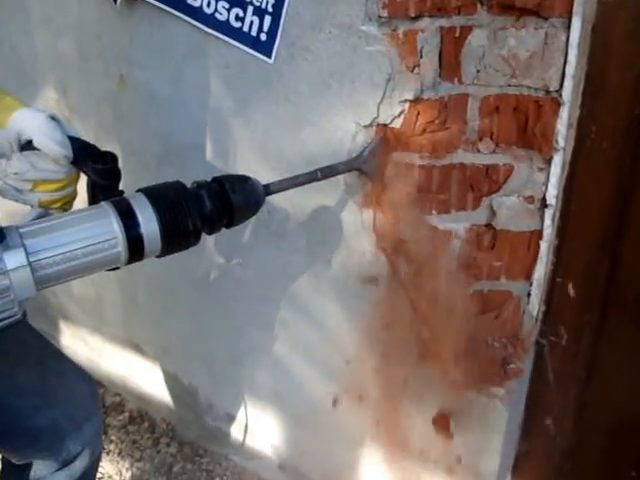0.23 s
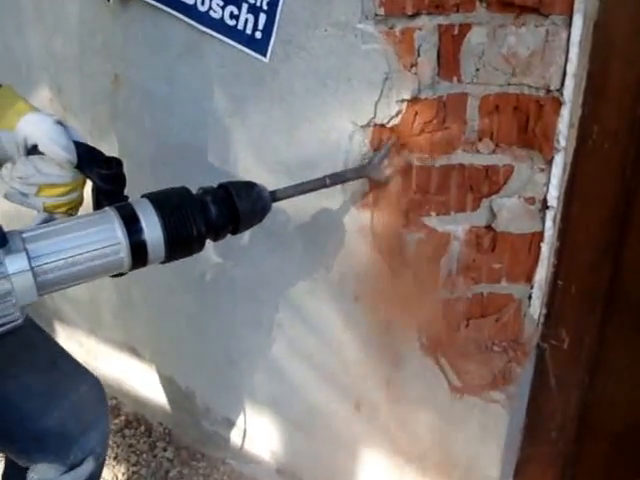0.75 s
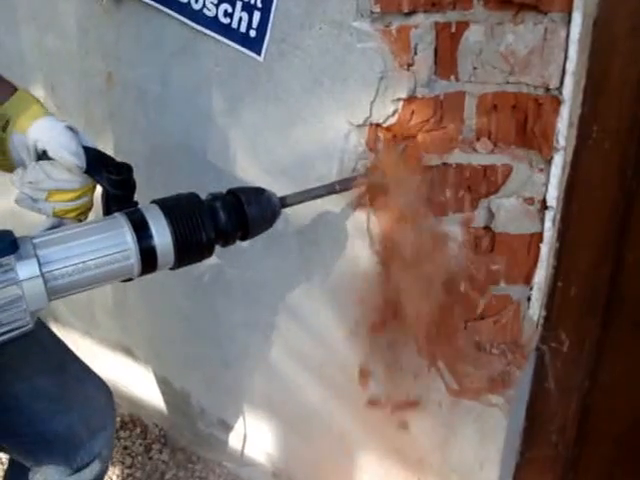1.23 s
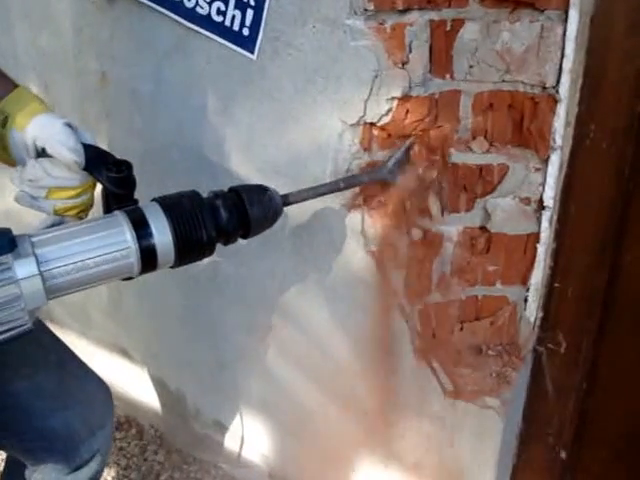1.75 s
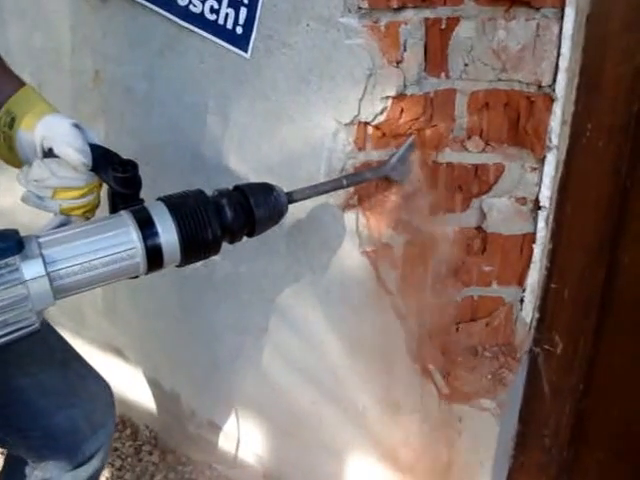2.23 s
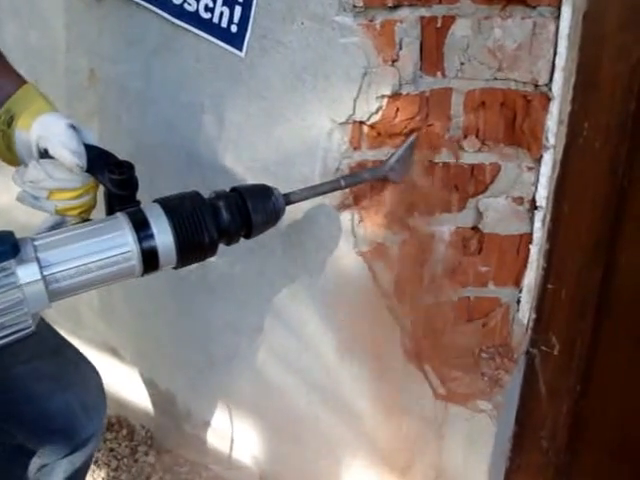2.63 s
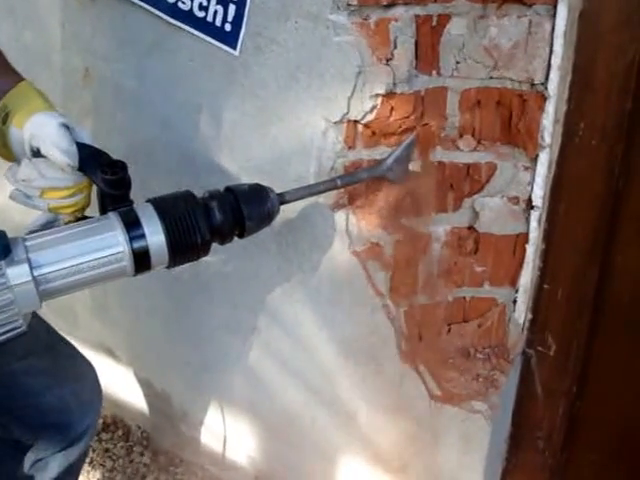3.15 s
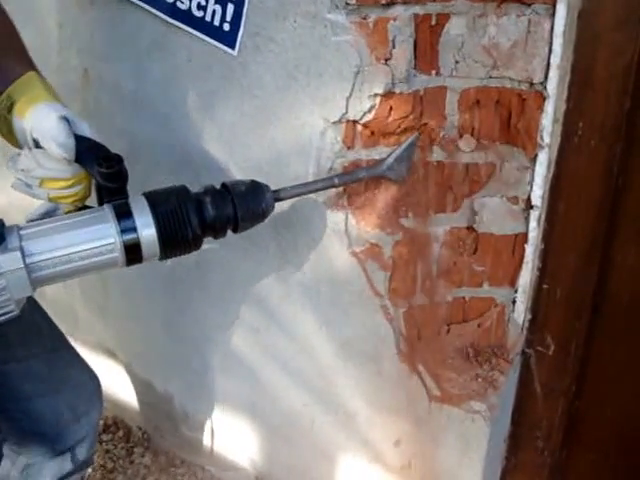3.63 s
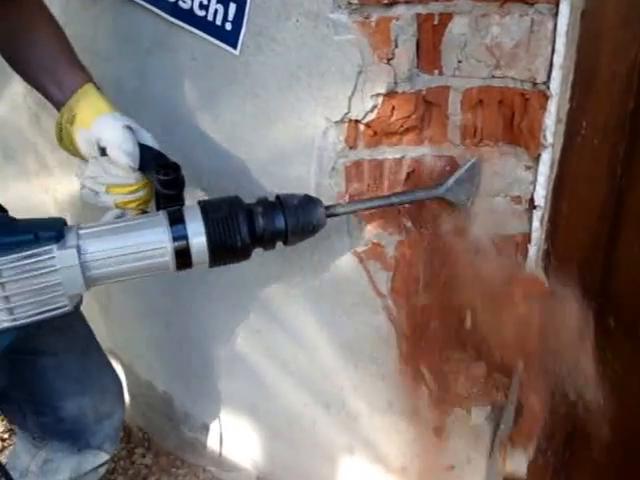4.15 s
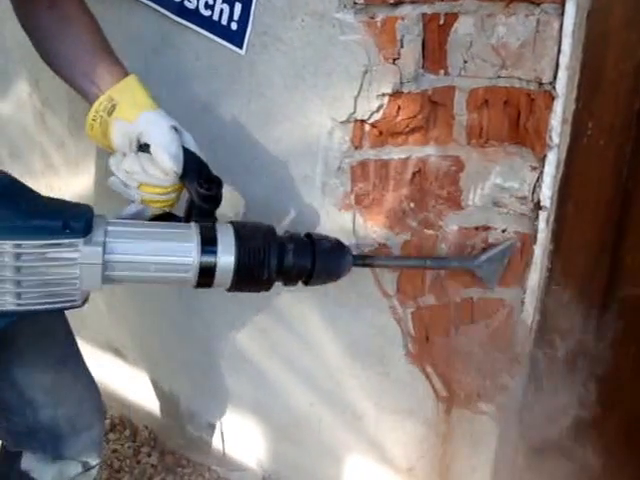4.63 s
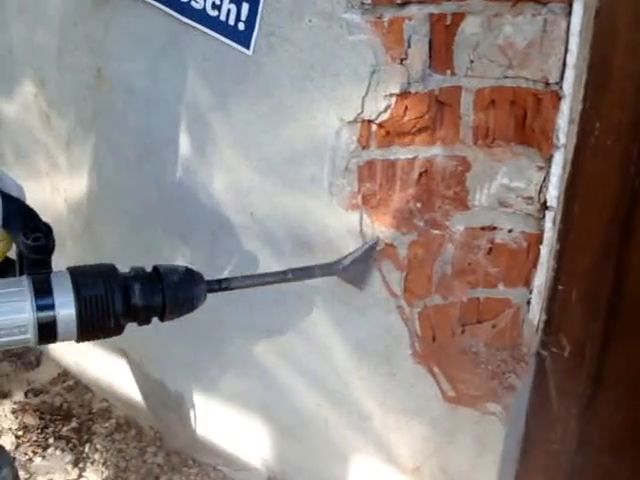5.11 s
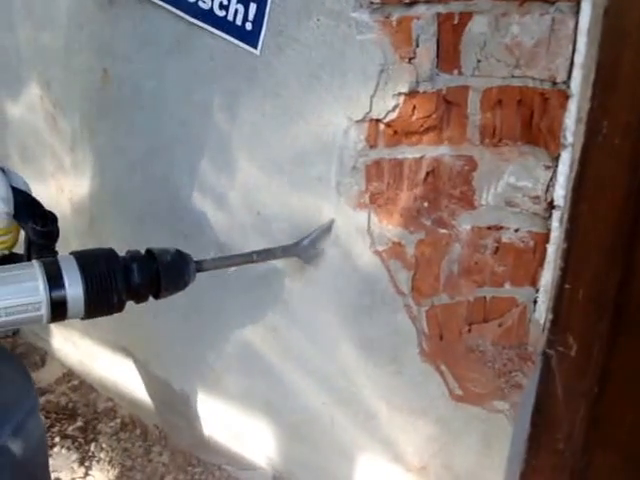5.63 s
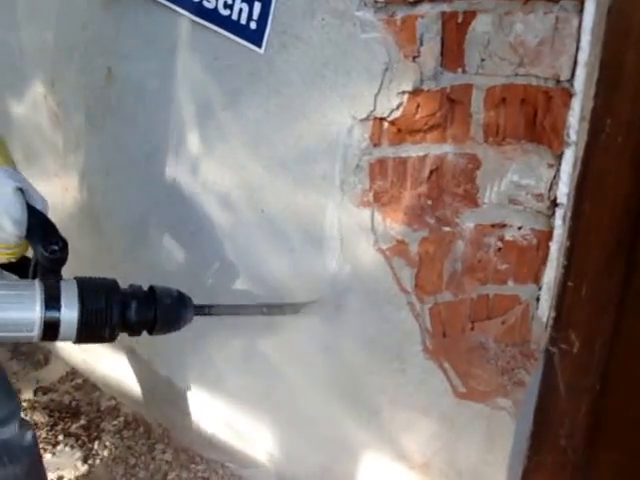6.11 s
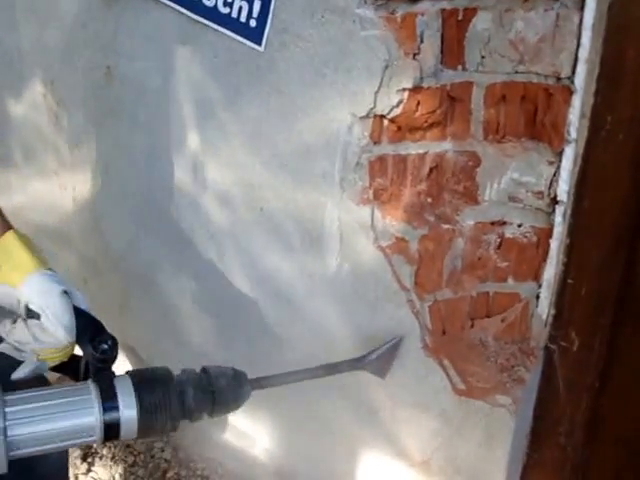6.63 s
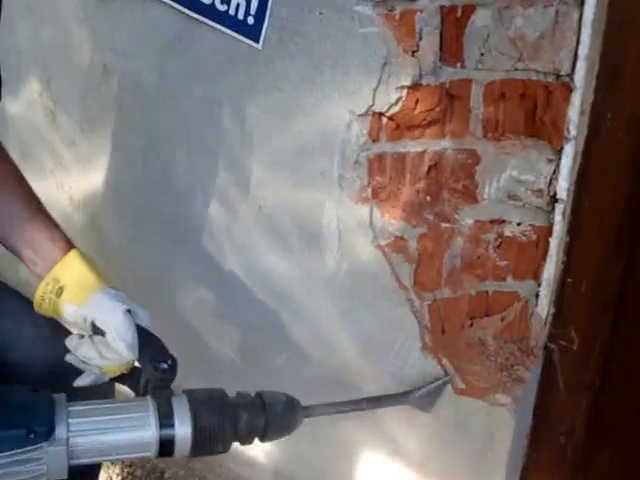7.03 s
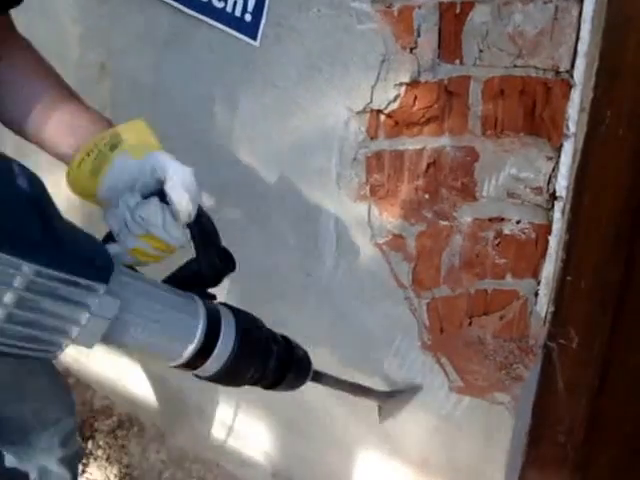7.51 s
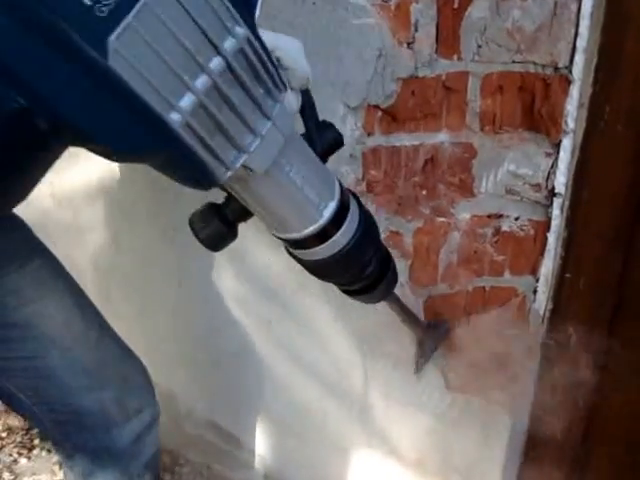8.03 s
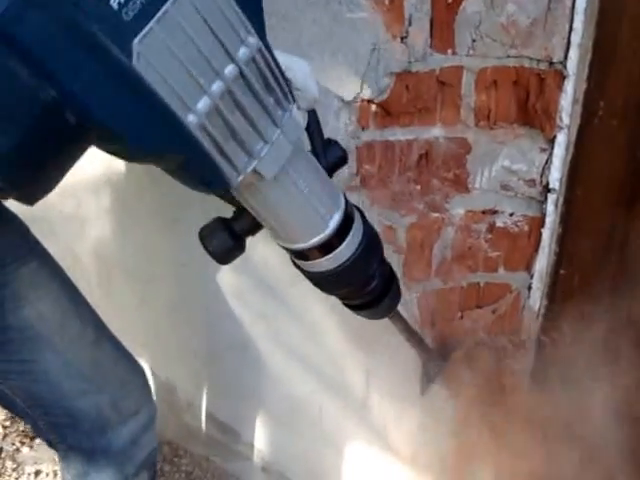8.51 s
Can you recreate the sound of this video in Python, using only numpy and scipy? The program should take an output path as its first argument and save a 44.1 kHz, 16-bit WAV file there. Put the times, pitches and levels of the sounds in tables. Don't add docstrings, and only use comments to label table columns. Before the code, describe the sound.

Close to a small camera outdoors, an electric demolition hammer pounds a plastered brick wall at about 26 blows a second. Each blow cracks plaster, knocks the wall and rings the steel chisel. Several near-continuous runs are followed by a long pause where the freewheeling motor whirrs and whines louder, then two shorter bursts and pauses, and a final run to the end.

```python
import sys
import numpy as np
from scipy import signal
from scipy.fft import rfft, irfft, next_fast_len
from scipy.io import wavfile
from scipy.ndimage import uniform_filter1d, minimum_filter1d, map_coordinates

SR = 44100
rng = np.random.default_rng(int(sys.argv[2]) if len(sys.argv) > 2 else 0)


def put_to_file(sound):
    columns = np.atleast_2d(sound).T
    safe = np.clip(columns, -1, 1)
    whole_steps = np.round(safe * 32767)
    wavfile.write(sys.argv[1], SR, whole_steps.astype(np.int16))


def rack_gain(trim_db):
    fader = np.asarray(trim_db, float)
    return 10 ** (fader / 20)


N = 386757


def unit(x):
    return x / np.sqrt(np.mean(x ** 2) + 1e-20)


def along(points, hz):
    f, v = np.transpose(points)
    return np.interp(np.log(hz + 1), np.log(f + 1), v)


def curves(rows):
    s, *columns = np.transpose(rows)
    return [np.interp(np.arange(N) / SR, s, column) for column in columns]


def wobble(rate):
    knots = rng.standard_normal(int(N * rate / SR) + 4)
    return map_coordinates(knots, [np.arange(N) * rate / SR])


def filtered(x, response):
    m = next_fast_len(x.shape[-1] + 8192)
    spectrum = rfft(x, m) * response(np.fft.rfftfreq(m, 1 / SR))
    return irfft(spectrum, m)[..., :x.shape[-1]]


def modes(table):
    def response(f):
        total = 0
        for k, (centre, width, db) in enumerate(table):
            total = total + (-1) ** k * rack_gain(db) * 1j * f * width / (centre * centre - f * f + 1j * f * width)
        return total
    return response


def hiss(response):
    return unit(filtered(rng.standard_normal(N), response))


def laid(rows, starts):
    at = starts[:, None] + np.arange(rows.shape[1])
    return np.bincount(at.ravel(), rows.ravel(), N + SR)[:N]


def yard():
    return rack_gain(-74) * hiss(modes([(170, 180, 0)]))


# start_s, blows_since_run_start
CRANK_RUNS = [
    [(0.0273, 0), (0.8209, 21), (1.0862, 28)],
    [(1.1241, 0), (1.8058, 18)],
    [(1.8437, 0), (2.3754, 14)],
    [(2.4134, 0), (2.9828, 15), (3.7838, 36)],
    [(3.8219, 0), (4.0509, 6), (4.0916, 7)],
    [(4.2002, 0), (4.3922, 5), (4.4724, 7)],
    [(5.4468, 0), (5.5511, 3), (5.6947, 7), (5.8058, 10), (5.9936, 15), (6.183, 20)],
    [(6.8812, 0), (6.9937, 3), (7.1867, 8)],
    [(7.99, 0), (8.0644, 2), (8.1402, 4), (8.7539, 20)],
]


def strokes():
    times = []
    for run in CRANK_RUNS:
        mark_s, blow = np.transpose(run)
        times.append(np.interp(np.arange(run[-1][1] + 1), blow, mark_s))
    return times


# lifted_s, landed_s, whirr_at_lift_db, gain_recovery_db_per_s, gain_left_after_landing_db
PAUSES = [
    (4.49, 5.441, -34.5, 16.5, 8.5),
    (6.22, 6.845, -38, 21.5, 9),
    (7.22, 7.957, -37, 28, 5.5),
]
MESH_PER_STROKE = 183.2


def speed():
    peak_s, hunt_hz, settle_s = 0.28, 1.47, 0.26
    free_hz, swing_hz, lowest_hz = 5255, 169.2, 4840
    t = np.arange(N) / SR
    runs = strokes()
    middle_s = np.concatenate([(s[1:] + s[:-1]) / 2 for s in runs])
    mesh_hz = np.interp(t, middle_s, np.concatenate([MESH_PER_STROKE / np.diff(s) for s in runs]))
    load = np.ones(N)
    for lift, land, *_ in PAUSES:
        off = (t > lift) & (t < land)
        u, w = t[off] - lift - peak_s, 2 * np.pi * hunt_hz
        hunt = swing_hz * np.exp(-u / settle_s) * np.cos(w * u - np.arctan(1 / (w * settle_s)))
        mesh_hz[off] = np.maximum(free_hz + hunt, lowest_hz)
        load[off] = 0
    return np.clip(mesh_hz, 4770, 5500), load


def gain_db():
    work_db, ceiling_db, duck_s = -32, -19.5, 0.16
    nearer_db = 1.43
    t = np.arange(N) / SR
    level = np.full(N, float(work_db))
    for lift, land, from_db, rise_db, left_db in PAUSES:
        landed = work_db + nearer_db + left_db * np.exp(-np.abs(t - land) / duck_s)
        level = np.where(t > land, landed, level)
        climbing = np.minimum(from_db + rise_db * (t - lift), ceiling_db)
        level = np.where((t > lift) & (t <= land), climbing, level)
    return uniform_filter1d(level, size=600)


# pitch_hz, level_db_per_hz
WHIRR = [(24, -83), (40, -45), (158, -54), (278, -27.5), (490, -12.5), (954, -5.5), (1100, -2),
         (1220, -3.5), (1340, -4), (2180, -2), (4090, -4), (5000, -7), (6500, -38), (11000, -120)]
# pitch_hz, width_hz, level_over_whirr_db
GEARBOX = [(1645, 12, 8), (1938, 75, 8.5), (2084, 350, 0), (2680, 130, 3), (3436, 67, 4)]
# pitch_hz, level_db_per_hz
FAN = [(3500, -38), (4800, 3), (7000, 0.5), (9000, -2.5), (10500, -16)]
# pitch_hz, width_hz, level_db
HOUSING = [(1113, 38, 0.5), (1327, 96, 4.5)]
# start_s, boom_db, fan_db, whine_db
FACING = [(0, -11.5, -0.5, -6.5), (1.4, -24, -9, -9), (4.1, -12, -14.5, -8.5), (4.55, -18, -3.5, -8.5),
          (4.75, -14, -4.5, -3), (5.1, -12.5, -5, -2), (5.43, -11.5, -4, -9), (5.5, -22, 2.5, -27),
          (6.18, -32, -8, -13), (6.5, -10, -3.5, 0.5), (6.83, -22, -6, -11), (6.9, -17.5, -2.5, -22),
          (7.3, -18, -6.5, -15), (7.47, -8.5, -3.5, 0.5), (7.65, -5.5, -6, -3), (7.94, -6.5, -4, 1.5),
          (8.0, -9.5, 1, -4), (8.77, -19, 0.5, -2)]


def motor():
    mesh_hz, load = speed()
    whirr_db = gain_db()
    boom_db, fan_db, whine_db = curves(FACING)
    turn = 2 * np.pi * np.cumsum(uniform_filter1d(mesh_hz, size=1500) + 4 * wobble(30)) / SR
    crank = turn / MESH_PER_STROKE
    throb_db = 1.23 * np.sin(crank) + 1.0 * np.sin(2 * crank + 2.2)
    whirr = hiss(lambda hz: rack_gain(along(WHIRR, hz)) * (1 + abs(modes(GEARBOX)(hz)) * 0.54))
    whirr += rack_gain(-10.0 + 5.6 * np.sin(crank + 4.8)) * np.sin(.432 * turn + 0.66 * wobble(120))
    boom = rack_gain(boom_db + 3.2 * throb_db) * hiss(modes(HOUSING))
    fan = rack_gain(fan_db) * hiss(lambda hz: rack_gain(along(FAN, hz)))
    first_pair = np.sin(turn + 1.7 * load * np.sin(crank))
    second_pair = np.sin(0.843 * turn + 0.43 * wobble(90))
    second_pair *= rack_gain(-25 + 3.5 * np.sin(crank) + 4.0 * wobble(60))
    whine = rack_gain(whirr_db + whine_db + 4.5 + 1.4 * wobble(40) + 1.0 * np.sin(crank)) * (first_pair + second_pair)
    return rack_gain(whirr_db) * (rack_gain(throb_db) * whirr + boom + fan) + whine


# free_ring_s, slab_ring_db, blade_over_steel_db, knock_ringing_in_wall_0_to_1
SEATS = [(0.023, -40.5, -7, 0.57), (0.027, -43.5, -2, 1), (0.03, -41, -11, 0.8), (0.016, -39, -6, 0.56),
         (0.029, -44, -7, 0.2), (0.032, -51, -3.5, 0.2), (0.047, -53, -3.5, 0.45), (0.031, -50, -6.5, 0.4),
         (0.099, -43.5, -6, 0.25)]
# start_s, level_over_blow_db
STRAYS = [
    (4.1657, 0.5),
    (4.4111, -5),
    (6.8475, 2.5),
    (7.9563, 0),
    (7.9781, -4.5),
]


def blows():
    regular = np.concatenate(strokes())
    stray_s, stray_db = np.transpose(STRAYS)
    s = np.concatenate([regular, stray_s])
    extra_db = np.concatenate([np.zeros(len(regular)), stray_db])
    run = np.searchsorted([marks[-1][0] for marks in CRANK_RUNS], s)
    order = np.argsort(s)
    return s[order], extra_db[order], np.array(SEATS)[run[order]].T


def struck(table, size, starts):
    answer = filtered(np.eye(1, SR // 4)[0], modes(table))
    return signal.fftconvolve(laid(size[:, None], starts), answer / np.linalg.norm(answer))[:N]


# pitch_hz, width_hz, level_db
WALL = [(2700, 3460, -8.5), (1666, 28, -4), (2530, 166, 9.5), (2000, 110, 2), (3510, 35, -3)]
# pitch_hz, width_hz, level_db
BRICK = [(91, 140, -17.5), (169.6, 17, -3.5), (214, 20, -5), (248, 23, -2.5), (320, 20, -7), (360, 50, -10)]
# pitch_hz, width_hz, level_db
SLAB = [(493.3, 15.5, 0.5), (585.7, 18, -0.5), (697, 16, 0), (792, 19.6, -2), (893, 11, -2), (976, 14, -1),
        (1110, 34, -4), (1694, 24, 4.5)]


def knock(start, crack_db, thud_db, slab_db, rings):
    size = rack_gain(crack_db + 22.0)
    rings = np.clip(rings + 0.22 * wobble(4.17)[start], 0, 1)
    wall = struck(WALL, size * rings, start) + struck(WALL[:1], 0.85 * size * (1 - rings), start)
    brick = struck(BRICK, rack_gain(thud_db + 30.0 + 1.8 * rng.standard_normal(len(start))), start)
    slab = struck(SLAB, rack_gain(slab_db + 0.6 * (thud_db - thud_db.mean()) + 35.0), start)
    return -wall - brick - slab


# pitch_hz, level_db_per_hz
CRUMBLE = [(200, -49), (600, -9.5), (1200, -5), (2400, 3.5), (3500, 3.5), (5000, -7.5), (8000, 4.5),
           (10500, -41.5)]


def plaster(start, crack_db):
    count = len(start)
    t = np.arange(SR // 16) / SR
    spot = np.arange(count)[:, None] / 9
    spots = rng.standard_normal((count // 9 + 2, len(t)))
    wall = map_coordinates(spots, np.broadcast_arrays(spot, np.arange(len(t))), order=1)
    answer = 1.04 * wall + 0.67 * rng.standard_normal(wall.shape)
    burst = answer * (rack_gain(-60 * t / 0.012) + 0.67 * rack_gain(-60 * t / 0.091))
    return filtered(laid(rack_gain(crack_db + 3.5)[:, None] * burst, start), lambda hz: rack_gain(along(CRUMBLE, hz)))


def rattle(count, t, rate):
    knots = np.clip(rng.standard_normal((count, 60)), -2, 1)
    return map_coordinates(knots, np.broadcast_arrays(np.arange(count)[:, None], t * rate), order=1)


def ring(count, t, hz, t60, spread_hz, flutter_db):
    draw = rng.standard_normal((count, 3, 1))
    pair = np.sin(2 * np.pi * (hz + spread_hz * draw[:, 0]) * t)
    pair += 0.59 * np.sin(2 * np.pi * (hz + 4 * spread_hz * draw[:, 1]) * t + 3 * draw[:, 2])
    return pair * rack_gain(flutter_db * rattle(count, t, 267) - 60 * t / t60) * (1 - np.exp(-t / 0.00044))


# pitch_hz, t60_s
MAIN_RING = (6665, 0.41)
# pitch_hz, width_hz, level_db
STEEL = [(6920, 38, -2.5), (7220, 370, -1.5), (8516, 152, 0.5), (8870, 400, -6), (9800, 58, -3.5)]
# pitch_hz, width_hz, level_db
BLADE = [(5540, 264, 2.5)]


def steel(start, ring_db, steel_db, hold_s, blade_db):
    count = len(start)
    t = np.arange(SR // 16) / SR
    free_s = (hold_s * np.exp(0.32 * rng.standard_normal(count)))[:, None]
    damped = rack_gain(-27.5) + 1 / (1 + np.exp((t - free_s) / 0.0038))
    main = damped * ring(count, t, *MAIN_RING, spread_hz=16.5, flutter_db=6.0)
    main *= (rack_gain(ring_db - 0.24) / main[:, :1100].std(1))[:, None]
    chatter = rng.standard_normal((count, len(t))) * damped * rack_gain(8.9 * rattle(count, t, 253) - 60 * t / 0.1)
    chatter /= 1.64 * chatter[:, :900].std(1)[:, None]
    others = filtered(laid(rack_gain(steel_db + 18.0)[:, None] * chatter, start), modes(STEEL))
    others += filtered(laid(rack_gain(steel_db + blade_db + 20.5)[:, None] * chatter, start), modes(BLADE))
    return laid(main, start) + others


# start_s, wall_force_db, chisel_ring_db, shank_rattle_db, thud_db
BITE = [(0.03, -22.5, -25, -30.5, -58), (0.22, -19, -28.5, -25, -53), (1.06, -18.5, -32, -28.5, -59),
        (1.2, -17.5, -21, -28, -50), (1.65, -18.5, -35, -28.5, -54.5), (1.83, -18.5, -23, -33, -60),
        (2.1, -18, -22.5, -23, -55), (3.0, -20, -23, -31, -55), (3.36, -24, -32.5, -29.5, -53.5),
        (3.84, -19.5, -20.5, -26, -55), (4.09, -22.5, -33, -29.5, -63), (4.2, -23, -21.5, -26.5, -52),
        (4.47, -21.5, -27, -30, -64.5), (5.45, -18, -27.5, -23, -53.5), (6.18, -21.5, -31.5, -26, -56.5),
        (6.85, -21, -23, -25.5, -52), (7.19, -26, -31.5, -25, -56), (7.96, -22, -25.5, -27.5, -56)]
# force_db, ring_db, rattle_db
SCATTER = (1.0, 2.0, 1.15)


def chisel():
    s, extra_db, (hold_s, slab_db, blade_db, rings) = blows()
    start = np.round(s * SR).astype(int)
    *levels, thud_db = (c[start] + extra_db for c in curves(BITE))
    crack_db, ring_db, steel_db = levels + (rng.standard_normal((len(s), 3)) * SCATTER).T
    crack_db = crack_db + 6.5 * (np.diff(s, prepend=0) > .9)
    wall = knock(start, crack_db, thud_db, slab_db, rings)
    return wall + plaster(start, crack_db) + steel(start, ring_db, steel_db, hold_s, blade_db)


def scene():
    return (yard() + motor() + chisel())[None]


def starved(x, margin_db, slope_db, scatter_db):
    hz, t, z = signal.stft(x, SR, nperseg=256)
    bands = np.abs(z[0, :128]).reshape(32, 4, -1)
    level = 10 * np.log10(np.abs(uniform_filter1d(np.mean(bands ** 2, 1), size=2)) + 1e-14)
    peak = -minimum_filter1d(-level, size=15)
    peak = np.maximum(peak, -minimum_filter1d(-peak, size=5, axis=0) - 8)
    step = np.repeat(rng.standard_normal((32, level.shape[1] // 3 + 1)), 3, axis=1)[:, :level.shape[1]]
    bass_db = slope_db * np.minimum(np.arange(32)[:, None] - 7.6, 0)
    need = peak - margin_db + bass_db + scatter_db * step
    keep = rack_gain(-56.0) + 1 / (1 + np.exp(2 * np.clip(need - level, -20, 20)))
    z[0, :128] *= np.repeat(keep, 4, axis=0)
    return signal.istft(z, SR, nperseg=256)[1][:, :N]


def band_limit(x):
    return signal.sosfilt(signal.butter(12, 10450, fs=SR, output="sos"), x)


def record(dry):
    x = starved(dry, margin_db=10.5, slope_db=2, scatter_db=5.5)
    x = filtered(x, lambda hz: 1 / (1 + (hz / 10250) ** 90))
    mix = np.clip(x, -.9, .9)
    return band_limit(mix)


dry = scene()
out = record(dry)
put_to_file(out)
```